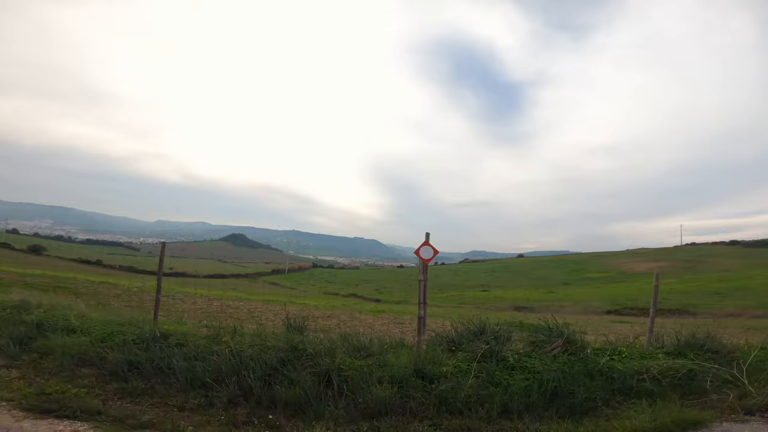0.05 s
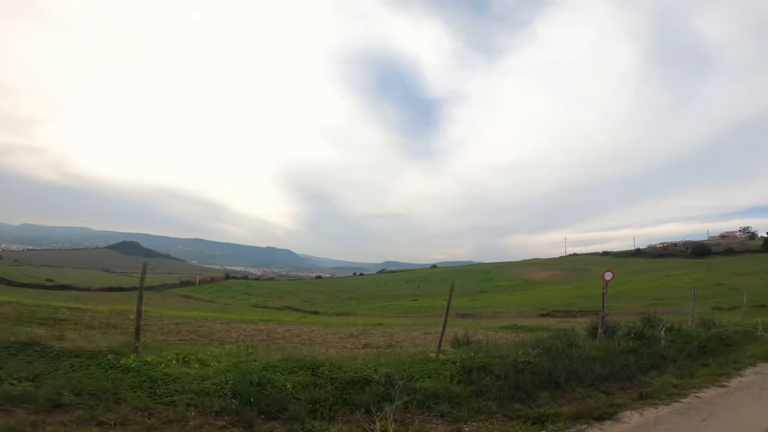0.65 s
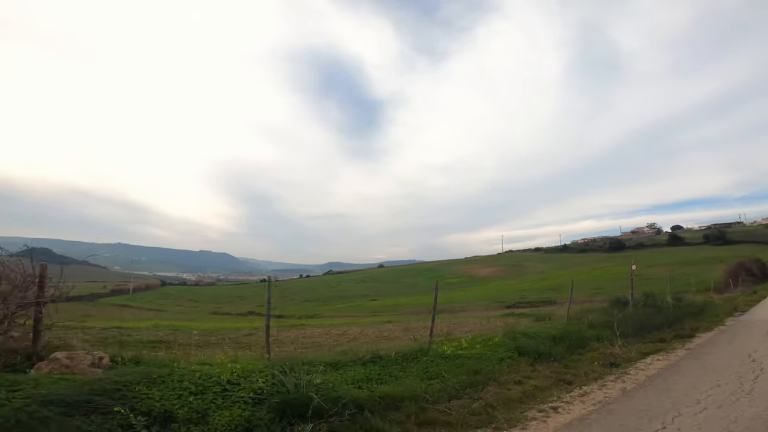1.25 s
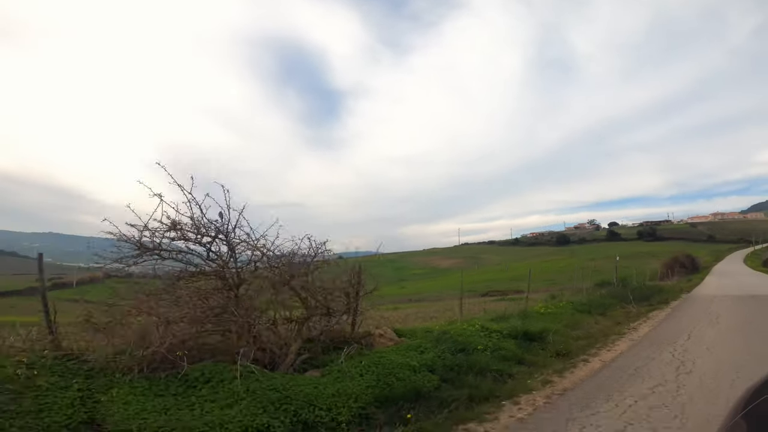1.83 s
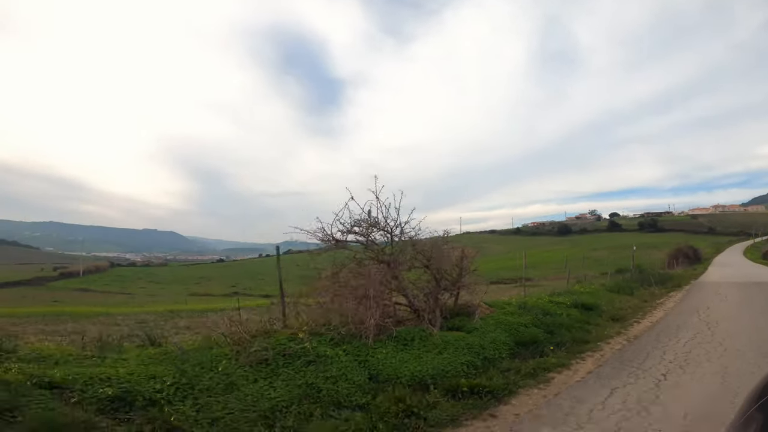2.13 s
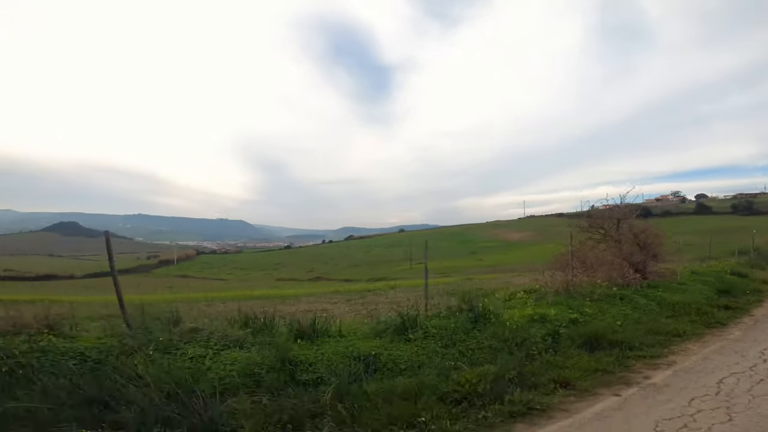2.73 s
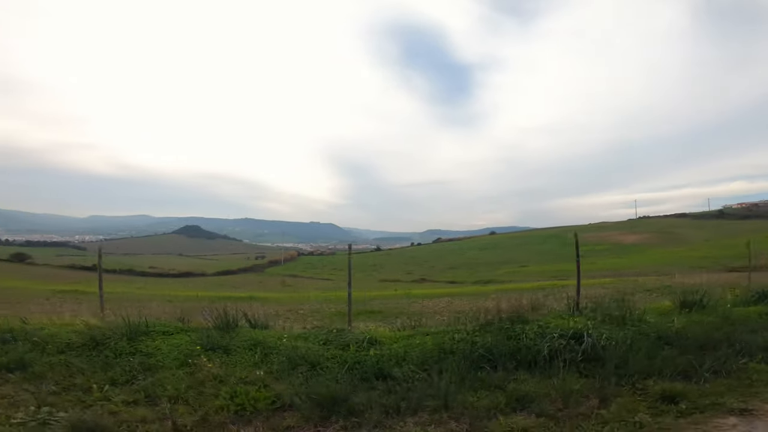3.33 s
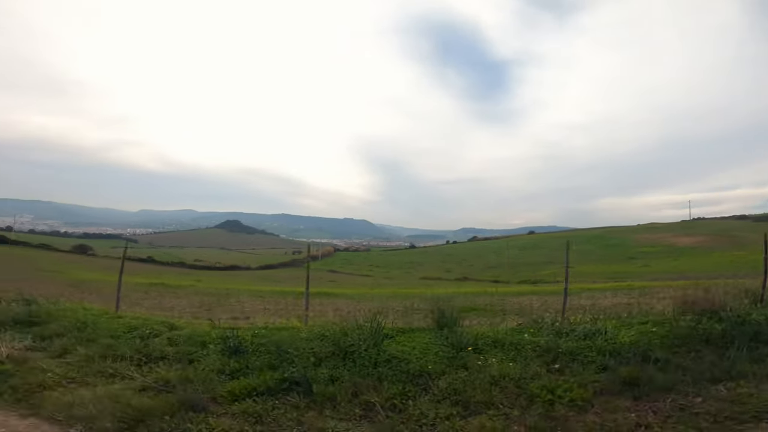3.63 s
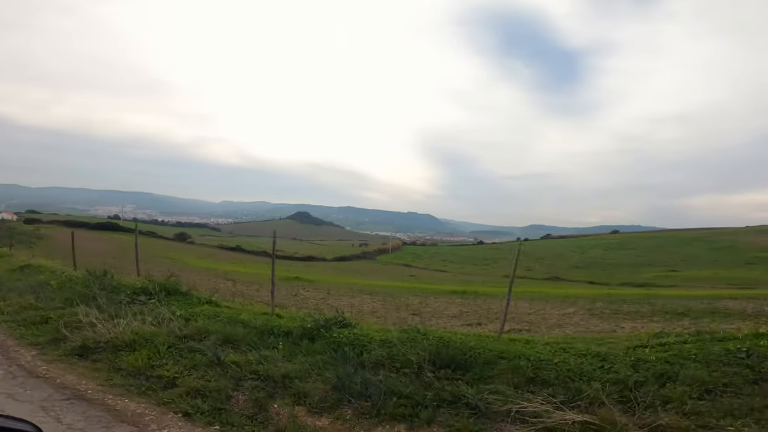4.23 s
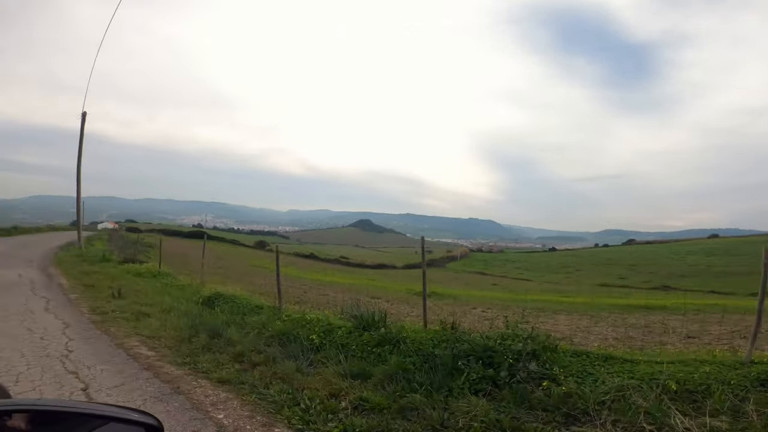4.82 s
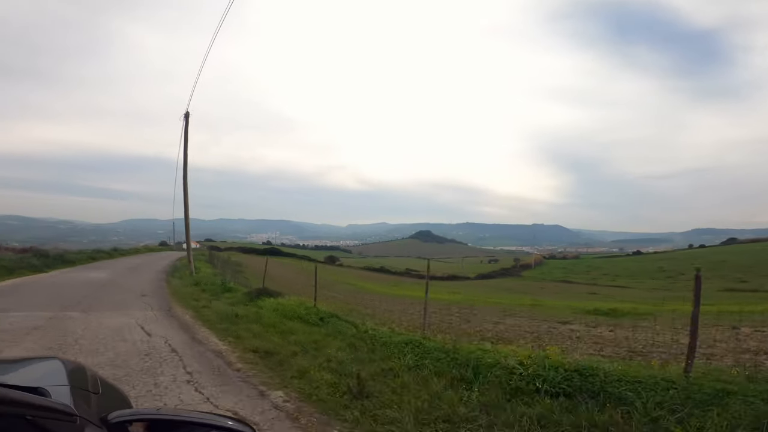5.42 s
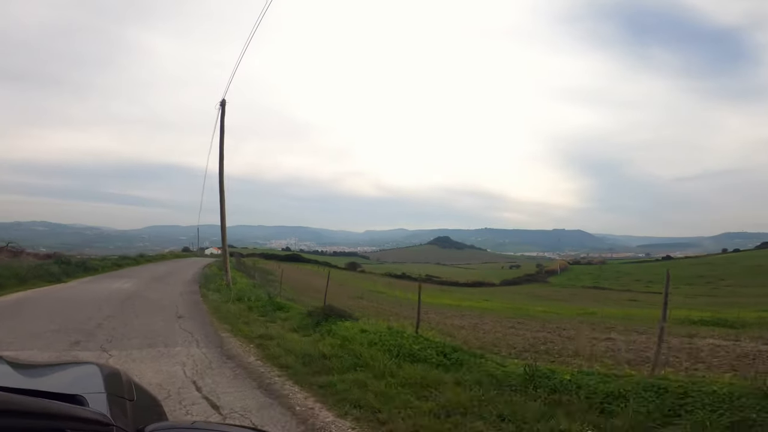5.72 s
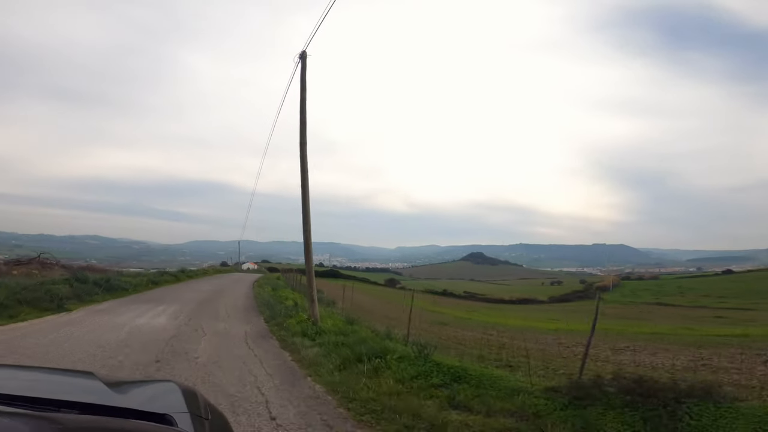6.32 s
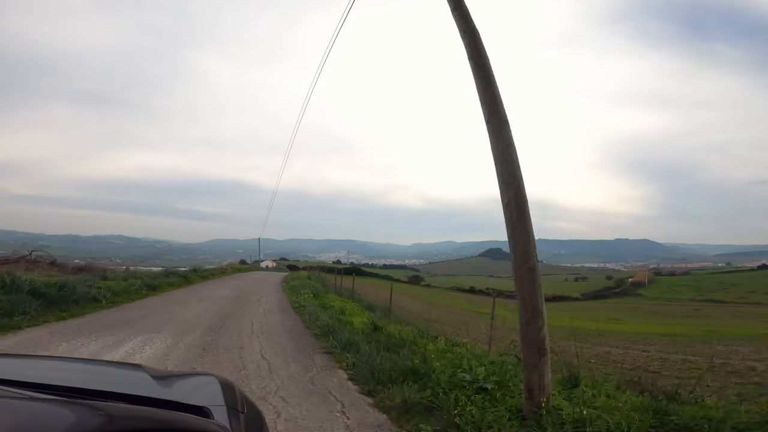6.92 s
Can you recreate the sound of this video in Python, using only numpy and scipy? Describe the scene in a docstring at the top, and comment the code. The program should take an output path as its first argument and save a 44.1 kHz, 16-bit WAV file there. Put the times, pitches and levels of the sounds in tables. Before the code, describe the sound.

Close wind rushes and flutters on a microphone at the window of a moving car, with a thin hiss on top. Behind it run a steady tyre roar and a low body rumble with brief swells. From about 1.5 to 2.6 seconds, soft flurries of grit crackle under the tyres. Small knocks from bumps come near 1.8, 2.6, 2.8 and 3.9 seconds. Gusts buffet the microphone with a hollow roar at about 3.4 and 4.2 seconds, then most strongly from 4.9 to 5.8 seconds, each carrying short, low howls that slide in pitch. At around 6 seconds the rush of air eases noticeably while the rumble and tyre noise carry on. A scatter of light knocks follows from 6.2 to 6.9 seconds, with a couple of faint squeaks from the car near the end.

```python
"""Wind at a car window

A country road, the camera microphone held at the window of a moving car, turning from the verge to face
forward. Body and tyres rumble behind, with low swells, flurries of grit, small knocks and faint squeaks.
Right on the microphone the slipstream rushes and flutters; as it turns into the wind, a few gusts
buffet its port with a hollow roar and short howls, then the air eases."""
import sys
import numpy as np
from scipy import signal
from scipy.fft import rfft, irfft
from scipy.io import wavfile
from scipy.ndimage import uniform_filter1d, minimum_filter1d

SR = 44100
rng = np.random.default_rng(int(sys.argv[2]) if len(sys.argv) > 2 else 0)


def put_to_file(sound):
    """Save the sound as 16-bit audio at rate SR, in the file named by the first command-line argument."""
    columns = np.atleast_2d(sound).T  # one column per channel
    safe = np.clip(columns, -1, 1)
    whole_steps = np.round(safe * 32767)
    wavfile.write(sys.argv[1], SR, whole_steps.astype(np.int16))


N = 306933


def gain_of(db):
    """Decibels to amplitude."""
    return 10 ** (np.asarray(db) / 20)


def unit_rms(x):
    """Scales to an rms of one."""
    return x / np.sqrt(np.mean(x ** 2) + 1e-20)


def add(mix, start_s, sound):
    """Adds a sound into the mix in place."""
    part = mix[round(start_s * SR):][:len(sound)]
    part += sound[:len(part)]


def curves(rows):
    """Each column after the time column, interpolated over all samples."""
    times, *columns = np.transpose(rows)
    return np.array([np.interp(np.arange(N) / SR, times, column) for column in columns])


def swell(at_s, width_s):
    """A smooth hump of height one around a moment."""
    return np.exp(-((np.arange(N) / SR - at_s) / width_s) ** 2)


def bursts(rows):
    """An envelope of brief swells that add in power."""
    return np.sqrt(sum((gain_of(db) * swell(middle, length / 2)) ** 2 for middle, length, db in rows))


def coloured(x, spectrum):
    """Filters a signal by a spectrum drawn on a log-frequency axis."""
    hz, db = np.transpose(spectrum)
    shape_db = np.interp(np.log(np.fft.rfftfreq(N, 1 / SR) + 1), np.log(hz), db)
    return irfft(rfft(x) * gain_of(shape_db), N)


def noise(spectrum):
    """Random noise with the given spectral shape; rms one."""
    return unit_rms(coloured(rng.standard_normal(N), spectrum))


def swings(slow_hz, fast_hz):
    """Random swings, mostly between two rates; rms one."""
    hz = np.fft.rfftfreq(N, 1 / SR)
    highpass = hz ** 2 / (hz ** 2 + slow_hz ** 2)
    rolloff = np.sqrt(1 + (hz / fast_hz) ** 2) * (1 + (hz / (10 * fast_hz)) ** 2)
    return unit_rms(irfft(rfft(rng.standard_normal(N)) * highpass / rolloff, N))


def resonate(x, hz, width_hz):
    """A single damped resonance."""
    carrier = np.exp(2j * np.pi * hz * np.arange(N) / SR)
    pole = np.exp(-np.pi * width_hz / SR)
    return 2 * (carrier * signal.lfilter([1 - pole], [1, -pole], x / carrier)).real


def glide(length, first_hz, last_hz, waver, flutter_db, fast_hz):
    """An unsteady tone that swells and dies as it slides between two pitches; rms one."""
    count = int(length * SR)
    hz = np.geomspace(first_hz, last_hz, count) * (1 + waver * swings(11, fast_hz)[:count])
    arch = np.sin(np.linspace(0, np.pi, count))
    flutter = gain_of(flutter_db * swings(9.2, fast_hz)[:count])
    return unit_rms(arch * flutter * np.sin(2 * np.pi * (np.cumsum(hz) / SR + rng.random())))


# Body vibration as heard at the window: f/Hz, relative level/dB
BODY_SPECTRUM = [(15, -32.5), (30, -27.5), (50, -12.5), (80, -5.5), (125, 0.5), (180, -3.5), (240, -4.5),
                 (320, -13), (500, -30.5), (1200, -84.5), (8000, -110)]

def body_rumble(bed_db=-35, boom_db=-35):
    """A low bed of vibration, lifting in the bend; a hollow boom grows in it with the rush of air."""
    rush_db = curves(AIR_LEVELS)[0]
    flow_db = rush_db - rush_db.max()
    bend_db = 3.5 * swell(at_s=4.24, width_s=1)
    bed_gain = gain_of(bed_db + bend_db + 0.078 * flow_db + 0.04 * swings(2.6, 4.2))
    boom = unit_rms(resonate(noise(BODY_SPECTRUM), hz=175, width_hz=41))
    return noise(BODY_SPECTRUM) * bed_gain + boom * gain_of(boom_db + 0.98 * flow_db)


# Swells within the rumble: middle t/s, length/s, centre f/Hz, level/dB
LOW_SWELLS = [(.44, 0.099, 179, -38.5), (.98, 0.094, 174, -39), (1.295, .05, 165.4, -37),
              (1.461, .04, 123, -33), (1.582, .06, 140.6, -33), (2.02, .055, 169, -32),
              (2.9, .06, 161, -37), (3.04, .14, 159.4, -34.5), (3.22, 0.063, 179, -32.5),
              (3.515, .05, 144.3, -31), (4.02, .06, 121.5, -34.5), (4.401, .05, 118.5, -32),
              (5.595, .06, 162, -30.5), (5.95, .09, 138.3, -33.5), (6.117, 0.053, 134.2, -33),
              (6.48, 0.047, 99, -35), (6.595, 0.041, 138, -34.5), (6.799, 0.027, 137, -38)]

def low_swells(sag=0.25):
    """Brief low swells in the rumble, each a few cycles sinking in pitch."""
    out = np.zeros(N)
    for middle, length, hz, db in LOW_SWELLS:
        tone = glide(length, hz * (1 + sag), hz * (1 - sag), waver=0.11, flutter_db=2.5, fast_hz=60)
        add(out, middle - length / 2, gain_of(db) * tone)
    return out


# Tyres on the road below the window: f/Hz, relative level/dB
TYRE_SPECTRUM = [(20, -9), (60, 6.5), (110, 1), (200, 1.5), (400, 5), (600, 1), (950, 0), (1200, -5.5),
                 (1500, -12.5), (2400, -24.5), (3600, -25.5), (5500, -36.5), (8000, -55), (12000, -85.5)]

def tyres(level_db=-45.5):
    """Steady roar of tread on coarse asphalt, a little uneven with the surface."""
    return noise(TYRE_SPECTRUM) * gain_of(level_db + 0.63 * swings(4.4, 25))


# Squeaks from the car, far back in the mix:
# start t/s, length/s, first f/Hz, last f/Hz, level/dB, waver/share of pitch
SQUEAK_GLIDES = [(1.65, 0.028, 5980, 5850, -72, .006), (1.747, .035, 7300, 3600, -72, .025),
                 (6.675, 0.08, 2410, 2360, -70, .01), (6.837, 0.072, 1970, 1750, -60.5, .02)]

def squeaks():
    """Brief falling tones, some thin, some hoarse."""
    out = np.zeros(N)
    for start, length, first_hz, last_hz, db, waver in SQUEAK_GLIDES:
        add(out, start, gain_of(db) * glide(length, first_hz, last_hz, waver, flutter_db=2, fast_hz=250))
    return out


# Flurries down at road level: middle t/s, length/s, level/dB
GRIT_FLURRIES = [(1.456, 0.059, -58.5), (1.54, 0.12, -58.5), (1.64, 0.083, -59.5), (1.74, .05, -65),
                 (1.835, 0.04, -61), (1.985, 0.11, -55), (2.098, 0.069, -57.5), (2.23, .06, -59),
                 (2.32, .04, -65), (2.41, .07, -61), (2.495, 0.037, -60), (2.57, .05, -57),
                 (3.835, 0.046, -59)]
# Their crackle: f/Hz, relative level/dB
GRIT_SPECTRUM = [(500, -2), (1000, -8.5), (2200, 4), (4000, -6.5), (5200, -13), (7000, -19.5), (9500, -29),
                 (12000, -50)]

def road_grit(grain_db=4):
    """Short flurries of soft crackle, as from loose grit under the tyres."""
    grains = gain_of(grain_db * np.clip(swings(40, 220), -2, 2))
    return unit_rms(noise(GRIT_SPECTRUM) * grains) * bursts(GRIT_FLURRIES)


# Jolts on the cracked road: t/s, peak level before the cabin/dB, chatter decay/s, tilt/dB per octave
JOLTS = [(1.75, -30, 0.017, -12), (2.567, -30, 0.015, 1), (2.785, -31, 0.018, 2), (3.828, -30, 0.071, 0.5),
         (3.904, -29.5, 0.027, 3), (6.203, -34.5, 0.027, -13), (6.391, -38.5, .012, 0),
         (6.499, -36, 0.041, -2), (6.527, -34, .04, -3), (6.552, -35, .015, -9), (6.572, -37, 0.012, 4),
         (6.577, -32, 0.014, 1.5), (6.7912, -29.5, 0.009, 4), (6.7968, -26, 0.009, -2.5),
         (6.897, -35, 0.049, -3)]
# Modes of a nearby panel: f/Hz, width/Hz, relative level/dB
PANEL_MODES = [(580, 170, 12.5), (890, 450, 3.5), (1470, 410, -5), (2120, 350, -8), (3300, 900, -20)]
# The padded cabin lets little treble reach the microphone: f/Hz, gain/dB
CABIN_RESPONSE = [(100, 5), (3000, 2.5), (5000, -10), (8000, -17.5), (12000, -53)]

def panel_knocks(chatter=0.097, rise_s=0.0003):
    """Each jolt is a sharp blow and a brief chatter that ring the damped modes of a panel."""
    out, t = np.zeros(N), np.arange(4096) / SR
    ring = sum(gain_of(db) * width * np.exp(-np.pi * width * t) * np.sin(2 * np.pi * hz * t)
               for hz, width, db in PANEL_MODES)
    fft_size, lowest_hz = 2 * len(t), PANEL_MODES[0][0]
    octaves = np.log2(np.maximum(np.fft.rfftfreq(fft_size, 1 / SR), lowest_hz))
    for start, db, t60, tilt_db in JOLTS:
        force = (t == 0) + chatter * rng.standard_normal(len(t)) * np.exp(-np.log(1000) * t / t60)
        spectrum = rfft(signal.fftconvolve(force, ring), fft_size) * gain_of(tilt_db * octaves)
        knock = irfft(spectrum)[:len(t)] * np.minimum(t / rise_s, 1)
        add(out, start, gain_of(db) * knock / abs(knock).max())
    return coloured(out, CABIN_RESPONSE)


# Faint spurts of air at the microphone: middle t/s, length/s, level/dB
AIR_SPURTS = [(.23, .05, -76), (1.2, .04, -73), (1.32, .025, -73), (1.57, .02, -73), (1.835, .03, -74),
              (2.005, .015, -75), (2.1, .03, -77), (2.225, .025, -72.5), (2.42, .02, -76),
              (2.495, .025, -75), (2.57, .02, -74), (2.7, .025, -69), (2.8, .04, -71), (2.88, .05, -72),
              (3.3, .04, -77), (4.26, .05, -72), (4.97, .05, -72)]
# Their thin hiss: f/Hz, relative level/dB
SPURT_SPECTRUM = [(2500, -12), (4500, 1.5), (6500, -1), (8500, -7), (10500, -15), (12500, -34.5)]

def air_spurts(grain_db=4):
    """Quick, grainy spurts of hiss that flit over the rush."""
    grains = gain_of(grain_db * np.tanh(swings(40, 200)))
    return unit_rms(noise(SPURT_SPECTRUM) * grains) * bursts(AIR_SPURTS)


# Fine hiss of air right on the camera: f/Hz, relative level/dB
HISS_SPECTRUM = [(2000, -20.5), (4500, -7.5), (6100, 1.5), (7500, -5), (9000, -12.5), (10700, -20.5),
                 (12500, -33.5)]

def fine_hiss(flutter, flicks_per_s=300, spread_db=4):
    """Fluttering hiss with tiny flicks of turbulence, each a few milliseconds long, a few strong."""
    hiss = noise(HISS_SPECTRUM) * gain_of(1.25 * flutter - 1.2)
    sizes = gain_of(spread_db * np.minimum(rng.exponential(1, N), 2.8))
    impulses = sizes * (rng.random(N) < flicks_per_s / SR)
    envelope = np.sqrt(abs(signal.oaconvolve(impulses ** 2, np.hanning(160) ** 2, "same")))
    flicks = unit_rms(coloured(envelope * rng.standard_normal(N), HISS_SPECTRUM))
    return hiss + flicks * gain_of(-5)


# Flow over the camera, before its flutter: t/s, rush level/dB, keen level/dB, hiss gain/dB
AIR_LEVELS = [(0, -39.5, -58.5, -82), (.2, -41, -56.5, -79), (.42, -42, -59.5, -79.5),
              (.62, -40.5, -56, -74.5), (.82, -42, -57, -76.5), (1.18, -40.5, -56, -75.5),
              (1.36, -42, -62.5, -76), (2.67, -41, -64.5, -77.5), (2.71, -41.5, -57, -74),
              (2.78, -38, -57.5, -74), (2.93, -38, -56, -74), (3.05, -39.5, -56.5, -78),
              (3.2, -39.5, -58.5, -78), (3.45, -41.5, -60, -79.5), (3.75, -41.5, -61.5, -84),
              (4.05, -43, -59.5, -80.5), (4.28, -42, -56.5, -78), (4.65, -45, -59, -79),
              (4.85, -43.5, -55, -76), (4.99, -39, -55, -73), (5.38, -42, -57.5, -75),
              (5.59, -39, -54.5, -73), (5.68, -43, -56, -73), (5.76, -43.5, -62, -79.5),
              (5.96, -46, -62.5, -82.5), (6.08, -54.5, -67.5, -91), (6.5, -54, -66.5, -86),
              (6.96, -48.5, -72.5, -84)]
# Its broad rush, keen upper rush and topmost fizz, each: f/Hz, relative level/dB
RUSH_SPECTRUM = [(100, -12.5), (250, 3.5), (450, 3.5), (700, 1), (950, -1), (1300, -4), (1950, -8),
                 (2800, -18.5), (4300, -33.5), (7000, -53.5), (11000, -80.5)]
KEEN_SPECTRUM = [(1200, -14), (2300, 5), (3200, 1.5), (4300, -3.5), (5200, -11.5), (6200, -19), (8000, -32),
                 (12000, -53)]
FIZZ_SPECTRUM = [(5000, -20.5), (8000, -1.5), (10000, -1), (11500, -5), (12500, -12)]
# The fizz comes and goes: t/s, level/dB
FIZZ_COURSE = [(.05, -85), (.45, -86), (.65, -97), (1.1, -90), (1.4, -100), (2.6, -97), (2.85, -87),
               (3.2, -88), (3.7, -97.5), (4.28, -87), (4.6, -95), (5, -85.5), (5.65, -87.5), (6, -106)]

def slipstream():
    """Turbulence right on the microphone; large billows shake the rush, small eddies the hiss."""
    rush_db, keen_db, hiss_db = curves(AIR_LEVELS)
    billows = swings(0.57, 34.8)
    flutter = swings(3.4, 3.3)
    rush = noise(RUSH_SPECTRUM) * gain_of(rush_db + 1.14 * billows)
    keen = noise(KEEN_SPECTRUM) * gain_of(keen_db + 0.9 * billows + 0.75 * flutter + 0.49 * swings(11, 70))
    hiss = fine_hiss(flutter) * gain_of(hiss_db)
    fizz = unit_rms(noise(FIZZ_SPECTRUM) * gain_of(2.2 * swings(15, 200)))
    return rush + keen + hiss + fizz * gain_of(curves(FIZZ_COURSE)[0])


# Hollow roar of wind on the microphone port: f/Hz, relative level/dB
PORT_SPECTRUM = [(130, -31.5), (210, -3), (275, -1.5), (345, -1.5), (430, -7), (550, -13), (720, -16),
                 (1000, -33), (2000, -38), (5000, -77.5), (12000, -110)]
# That roar as the microphone turns into the wind: t/s, base level/dB
FACING_LEVELS = [(0, -45), (3.3, -41.5), (3.8, -38), (5.9, -34.5), (6.2, -38.5), (6.6, -42.5)]

def buffeting(roar_per_rush=0.67, lumpy_db=2):
    """Air on the port roars unevenly, louder with the flow and as the microphone faces into it."""
    rush_db, facing_db = curves(AIR_LEVELS)[0], curves(FACING_LEVELS)[0]
    flow_db = roar_per_rush * (rush_db - np.median(rush_db))
    return noise(PORT_SPECTRUM) * gain_of(facing_db + flow_db + lumpy_db * swings(1.6, 6.2))


# Gusts that hit the microphone head on: start t/s, length/s, held level/dB
PORT_GUSTS = [(3.35, 0.33, -36), (4.203, 0.12, -39.5), (4.886, 0.71, -37), (5.294, 0.49, -34.5)]

def gusts(rise_share=0.26, fall_share=0.33):
    """Each gust swells, holds and dies as a hollow roar on the port."""
    out = np.zeros(N)
    for start, length, db in PORT_GUSTS:
        progress = (np.arange(N) / SR - start) / length
        force = np.clip(np.minimum(progress / rise_share, (1 - progress) / fall_share), 0, 1)
        out += force * gain_of(db) * noise(PORT_SPECTRUM)
    return out


# Howls right at the port: start t/s, length/s, first f/Hz, last f/Hz, level/dB
HOWL_GLIDES = [(3.397, 0.16, 300, 274, -38.5), (4.222, 0.097, 382, 337, -38),
               (4.969, 0.18, 407, 333, -39.5), (5.102, 0.19, 346, 366.3, -32.5),
               (5.3, .095, 400, 235, -28.5), (5.409, 0.12, 314, 363, -37), (5.55, 0.13, 335, 314, -33.5),
               (5.591, 0.072, 200.4, 298, -34), (5.684, 0.15, 350.4, 309, -39)]

def howls():
    """Eddies shed at the height of a gust gather into short, hollow howls that slide in pitch."""
    out = np.zeros(N)
    for start, length, first_hz, last_hz, db in HOWL_GLIDES:
        howl = glide(length, first_hz, last_hz, waver=0.054, flutter_db=5, fast_hz=40)
        add(out, start, gain_of(db) * howl)
    return out


def scene():
    """One microphone at the window: air up close, car and road behind it."""
    air = buffeting() + gusts() + howls() + slipstream() + air_spurts()
    car = body_rumble() + low_swells() + tyres() + road_grit() + panel_knocks() + squeaks()
    return (air + car)[None]


def record(dry):
    """A quick limiter eases down the highest peaks; a low-pass then cuts the top of the treble."""
    ceiling_db, cutoff_hz = -18.7, 12600
    allowed = np.minimum(1, gain_of(ceiling_db) / (abs(dry) + 1e-9))
    held = minimum_filter1d(allowed, size=400)
    gain = uniform_filter1d(uniform_filter1d(held, size=200), size=200)
    lowpass = signal.firwin(511, cutoff_hz, window=("kaiser", 9), fs=SR)
    return signal.oaconvolve(dry * gain, lowpass[None], "same")


dry = scene()
out = record(dry)
put_to_file(out)
```